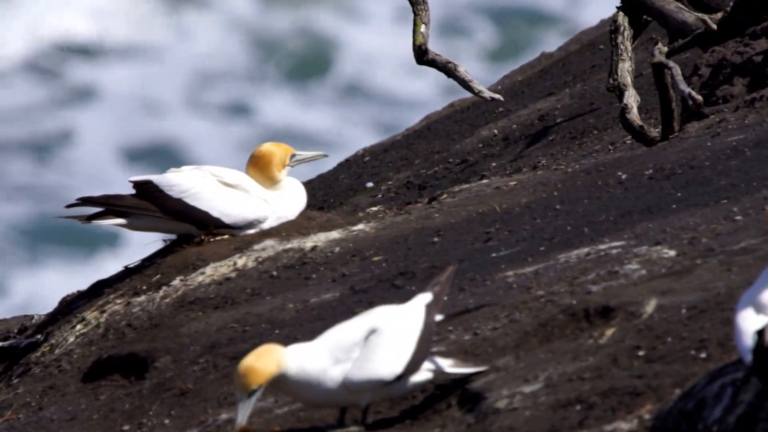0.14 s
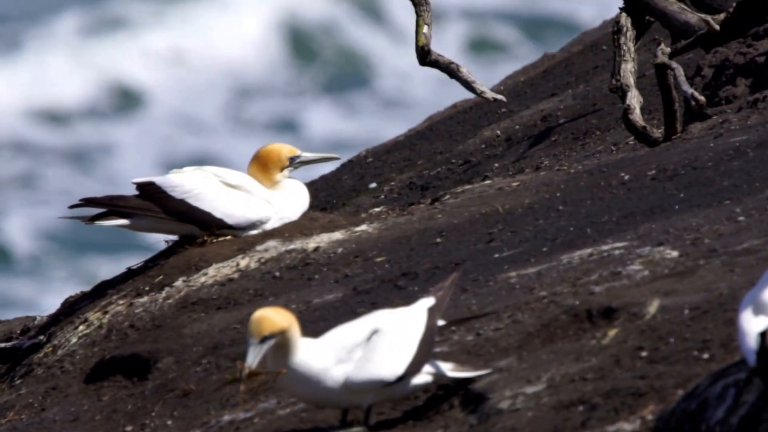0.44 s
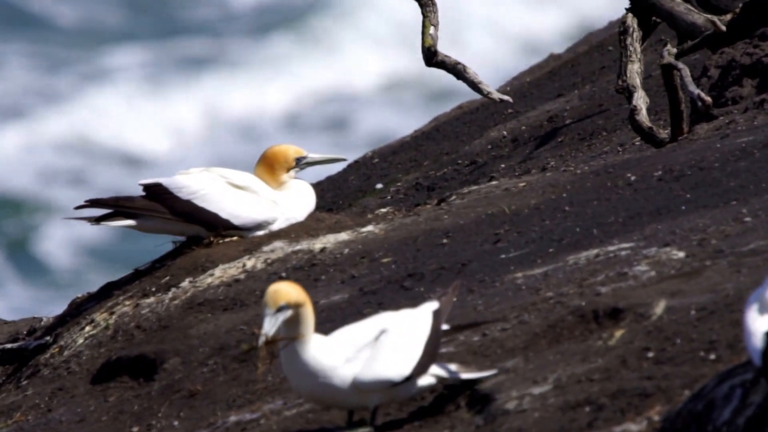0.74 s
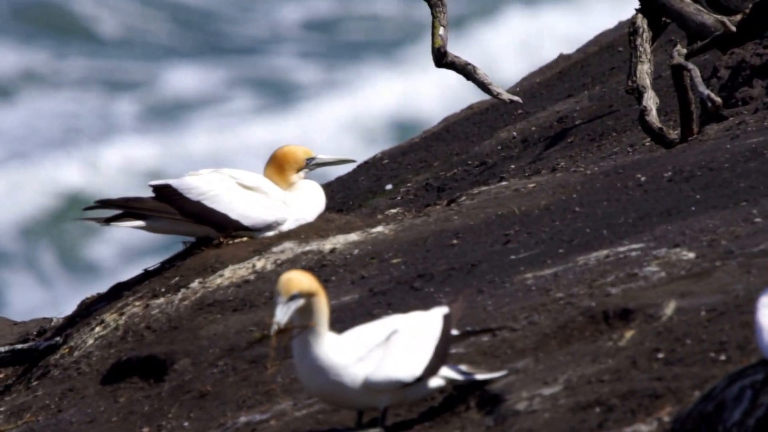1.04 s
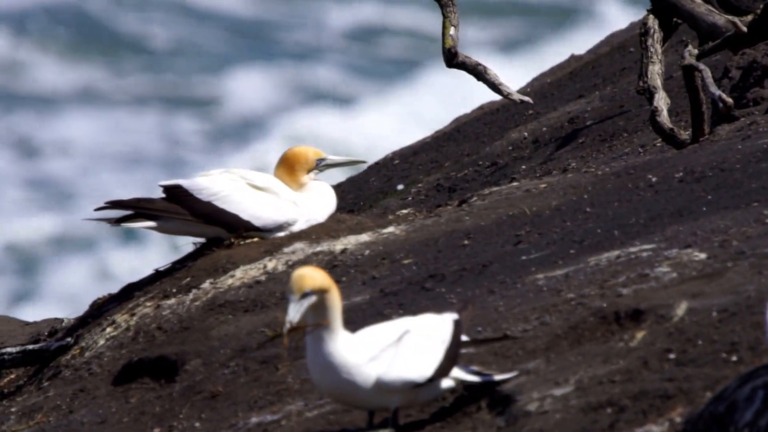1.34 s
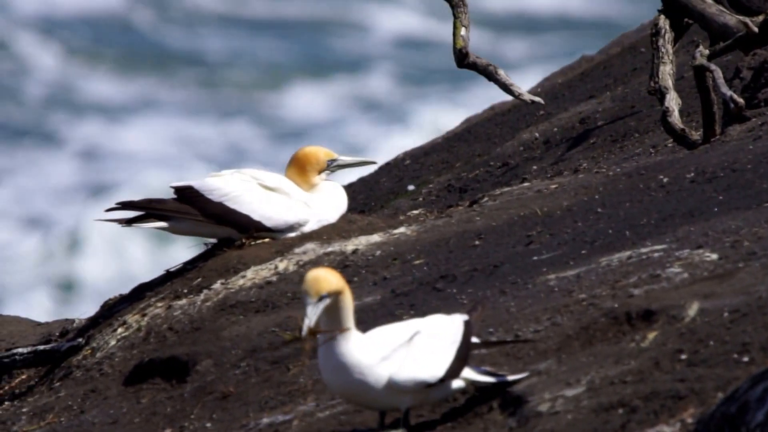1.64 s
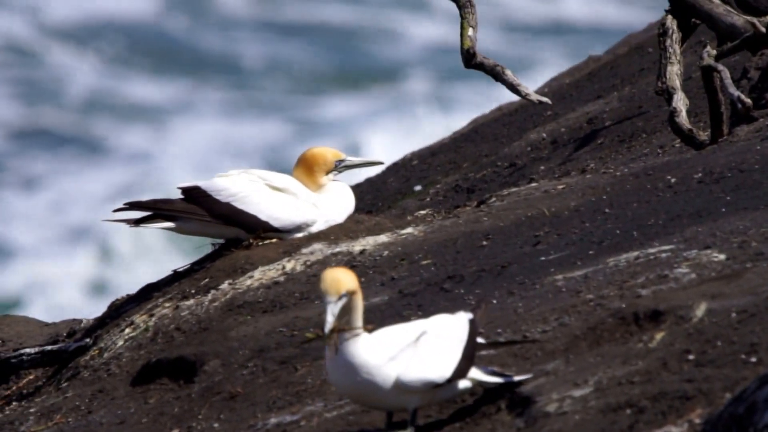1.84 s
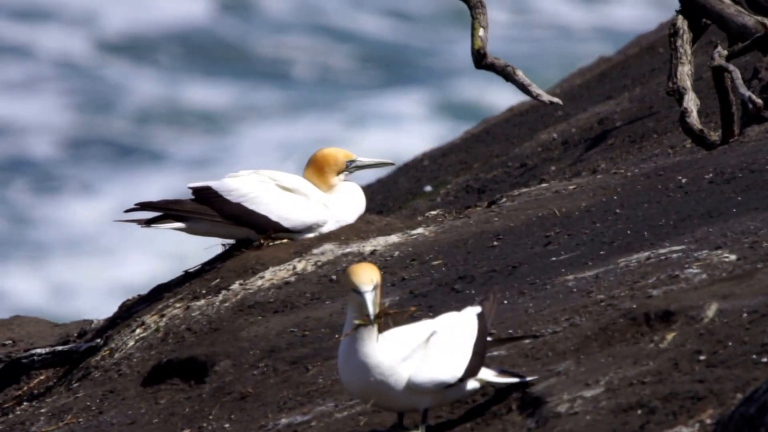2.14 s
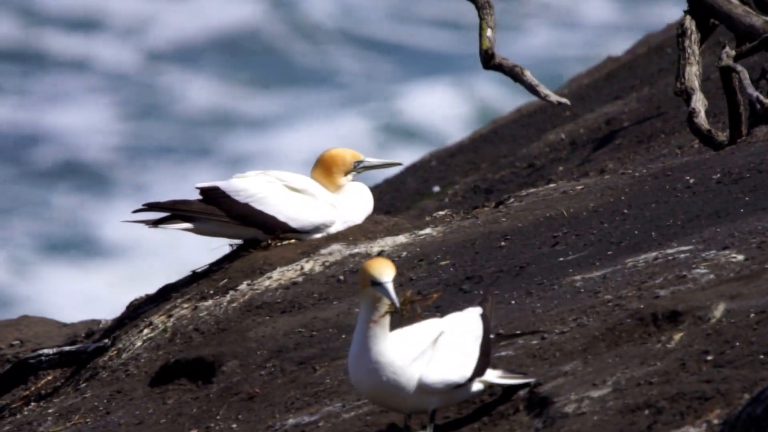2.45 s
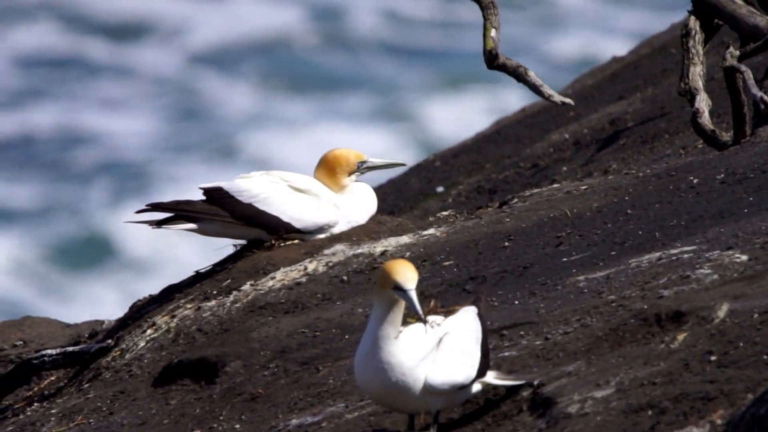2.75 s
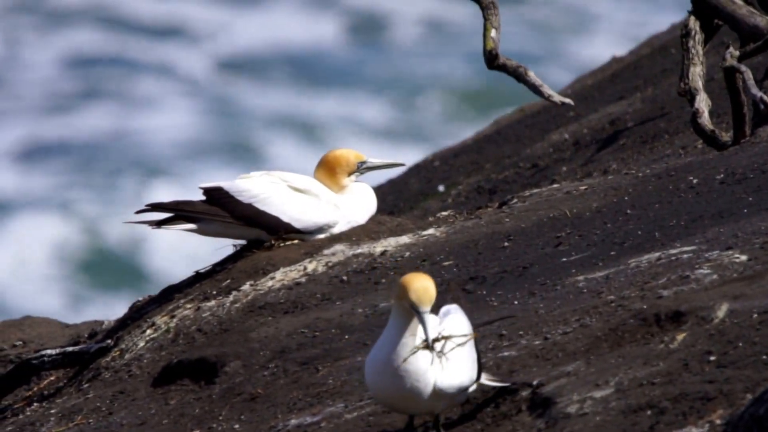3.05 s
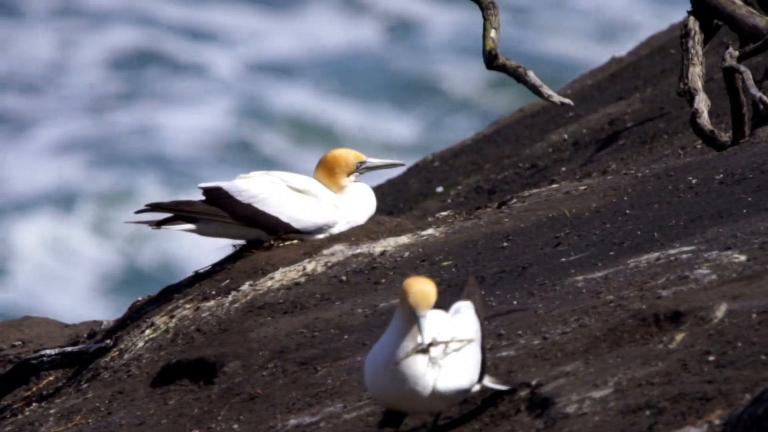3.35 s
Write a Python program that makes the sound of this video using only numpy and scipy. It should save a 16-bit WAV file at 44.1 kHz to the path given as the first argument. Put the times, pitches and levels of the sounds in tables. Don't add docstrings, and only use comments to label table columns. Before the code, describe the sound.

Seabird colony calling continually: short falling squeals, throbbing rasps and brief nasal honks, mostly toward the left. Low wind buffets a small stereo microphone, strongest in the first second, while surf hisses softly behind.

```python
import sys
import numpy as np
from scipy import signal
from scipy.fft import rfft, irfft, next_fast_len
from scipy.io import wavfile
from scipy.ndimage import uniform_filter1d

SR = 44100
rng = np.random.default_rng(int(sys.argv[2]) if len(sys.argv) > 2 else 0)


def inscribe(sig):
    pcm = np.round(np.clip(np.atleast_2d(sig).T, -1, 1) * 32767)
    wavfile.write(sys.argv[1], SR, pcm.astype(np.int16))


def to_linear_factor(level_db):
    exponent = np.asarray(level_db, float) / 20
    return 10 ** exponent


N = 153909
T, M = np.arange(N) / SR, next_fast_len(N)
F = np.fft.rfftfreq(M, 1 / SR)
PORT_SIGN = np.array([[1], [-1]])


def curve(table):
    hz, value = np.transpose(table)
    return np.interp(np.log(F + 1), np.log(hz), value)


def unit(x):
    return x / np.sqrt(np.mean(x ** 2))


def colour(x, gain):
    return irfft(rfft(x, M) * gain, M)[..., :N]


def band(x, hz, width):
    return colour(x, np.exp(-2 * ((F - hz) / width) ** 2))


def walk(rate):
    hold = int(SR / rate)
    steps = np.repeat(rng.standard_normal(N // hold + 1), hold)
    return 1.49 * uniform_filter1d(uniform_filter1d(steps, hold), hold)[:N]


def patchy(table, slow_db, quick_db, rate, lowest, count):
    spectrum = rfft(rng.standard_normal(M)) * to_linear_factor(curve(table))
    swell, octave = walk(3.3), np.log2((F + 1) / lowest)
    out = 0
    for k in range(count):
        bell = np.cos(np.pi / 2 * np.clip(2 * octave - k, -1, 1)) ** 2
        flicker_db = slow_db * swell + quick_db * walk(rate)
        out = out + irfft(spectrum * bell, M)[:N] * to_linear_factor(flicker_db)
    return unit(out)


# freq_hz [Hz], density_db [dB per Hz]
SURF_SPECTRUM = [(180, -38), (300, -7), (484, -4.5), (1050, -4), (3810, -13.5), (4880, -12.5),
                 (8990, -29.5), (10400, -34.5), (15500, -41)]
# freq_hz [Hz], common_share [0 to 1]
SURF_COHERENCE = [(500, 0.8), (1000, 0.88), (4000, 0.29), (8000, 0.68), (13000, 0.28)]


def surf():
    level_db = -42
    left, other = (patchy(SURF_SPECTRUM, .3, 1.2, 12, 200, count=14) for _ in range(2))
    common = np.clip(curve(SURF_COHERENCE), 0, 1)
    right = colour(left, common) + colour(other, np.sqrt(1 - common ** 2))
    return to_linear_factor(level_db) * np.array([left, right])


# time_s [s], level_db [dB]
GUSTS = [(0, -30.5), (.4, -28.5), (.55, -32.5), (.76, -27), (.85, -33), (1.2, -32.5), (1.29, -41.5),
         (1.64, -43.5), (1.699, -26.5), (1.8, -42), (1.92, -35), (2.27, -41), (2.34, -32.5), (2.64, -36),
         (2.74, -39.5), (3.15, -28.5), (3.49, -38)]
# freq_hz [Hz], density_db [dB per Hz]
WIND_IN_STEP = [(20, -5), (108, 0), (172, -1), (295, -7), (585, -21), (1100, -47)]
# freq_hz [Hz], density_db [dB per Hz]
WIND_OPPOSED = [(20, -27), (70, -5.5), (192, -5), (290, -8), (500, -16), (1100, -33)]


def turbulence():
    gust_db, flutter_db, eddy_db, opposed_db = -1, 2.8, 1.5, -0.5
    even_s = .07
    time_s, level_db = np.transpose(GUSTS)
    flow = to_linear_factor(np.interp(T, time_s, level_db) + gust_db + flutter_db * walk(55))
    eddies = [patchy(s, 0, eddy_db, 25.26, 19.9, count=13) for s in (WIND_IN_STEP, WIND_OPPOSED)]
    in_step, opposed = (e / np.sqrt(uniform_filter1d(e ** 2, int(even_s * SR))) for e in eddies)
    return flow * (in_step + to_linear_factor(opposed_db) * opposed * PORT_SIGN)


# [dB, sharp edge re peak]
BUFFETS = [(0.107, -9, 280, -9.5), (0.186, -23, 124, -10), (0.206, -11, 191, -10.5),
           (0.26, -16.5, 230, -11), (0.332, -13.5, 207, -11), (0.37, -15.5, 140, -9.5),
           (0.389, -15.5, 102, -6), (0.418, -12.5, 164, -11), (0.473, -22, 170, -14),
           (0.59, -12, 163, -4.5), (0.644, -18.5, 152, -10), (0.69, -23.5, 111, -10),
           (0.765, -13, 152, -12), (0.916, -23.5, 127, -8.5), (0.972, -17.5, 130, -12.5),
           (1.089, -19, 167, -8), (1.176, -21.5, 118, -8), (1.407, -26.5, 106, -14), (1.534, -31, 180, -11),
           (1.666, -18, 115, -9), (1.708, -22.5, 111, -11), (1.847, -26.5, 113, -13),
           (1.909, -27, 102, -13), (1.977, -24, 200, -12), (2.119, -27.5, 140, -4), (2.327, -20, 146, -6),
           (2.345, -20, 116, -5), (2.398, -21.5, 172, -3), (2.434, -27, 108, -16),
           (2.496, -20.5, 108, -11.5), (2.573, -34, 134, -15), (2.621, -20.5, 108, -10),
           (2.793, -29, 102, -10), (2.866, -22, 178, -11), (2.912, -18.5, 145, -11),
           (2.946, -18.5, 174, -3.5), (3.04, -19, 133, -6.5), (3.069, -15.5, 210, -8.5),
           (3.121, -12.5, 226, -12), (3.143, -14, 118, -1), (3.16, -14, 135, -4), (3.209, -23.5, 101, -10),
           (3.39, -18.5, 155, -8)]


def buffets():
    thump_db, turns = -3, 0.82
    edge_s, edge_hz = .0022, 420
    out = 0
    phases = 2 * np.pi * rng.random((len(BUFFETS), 2))
    for (start, db, hz, edge_db), (p, q) in zip(BUFFETS, phases):
        t = (T - start - .007) * hz
        in_step = np.sin(2 * np.pi * t + p)
        opposed = 0.72 * PORT_SIGN * np.sin(1.6 * 2 * np.pi * t + q)
        out = out + to_linear_factor(db + thump_db) * np.exp(-(t / turns) ** 2) * (in_step + opposed)
        t = T - start - .006
        edge = np.cos(2 * np.pi * edge_hz * t + np.array([[p], [q]]))
        out = out + to_linear_factor(db + edge_db) * np.exp(-(t / edge_s) ** 2) * edge
    return out


def wind():
    return signal.sosfilt(signal.butter(2, 800, fs=SR, output="sos"), turbulence() + buffets())


# start_s [s], level_db [dB], centre_hz [Hz]
BILL_CLICKS = [
    (1.147, -42, 6200),
    (3.453, -56, 12000),
    (3.316, -60, 11500),
    (3.336, -61, 11500),
]


def bill_clicks():
    noise, out = rng.standard_normal(N), 0
    for start, db, hz in BILL_CLICKS:
        burst = noise * np.exp(-((T - start) / 0.0045) ** 2)
        out = out + to_linear_factor(db) * band(burst, hz, hz / 2)
    return out


def calls(rows, partials_db, trill, bend, waver=.01):
    trill_hz, trill_drop, hoarse_db = 74, .05, 2
    attack_s, release_s = 0.0048, 0.0088
    out, wander, rough = np.zeros(N), walk(150), walk(120)
    for (start, length, db, hz0, hz1), (beat, tempo) in zip(rows, rng.random((len(rows), 2))):
        on = (T >= start) & (T < start + length)
        t = T[on] - start
        cycle = (t * trill_hz * (0.838 + 0.19 * tempo) + beat) % 1
        glide = hz1 + (hz0 - hz1) * (1 - t / length) ** bend
        hz = glide * (1 + waver * wander[on] - trill * trill_drop * (cycle - .5))
        phase = 2 * np.pi * np.cumsum(hz) / SR
        tone = sum(to_linear_factor(p) * np.sin((k + 1) * phase) for k, p in enumerate(partials_db))
        level = to_linear_factor(db + 6.5 + hoarse_db * np.sqrt(trill) * rough[on])
        shape = np.clip(t / attack_s, 0, 1) * np.clip((length - t) / release_s, 0, 1)
        chop = (1 - trill * np.cos(np.pi * cycle) ** 2) ** 2
        out[on] += level * shape * chop * tone
    return out


def far_calls():
    count, lowest_hz, change, level_db = 60, 739.3, 1.03, -61
    r = rng.random((count, 4))
    hz = lowest_hz * (1 + r[:, 3])
    rows = np.c_[r[:, 0] * N / SR, .03 + .06 * r[:, 1], level_db + 6 * r[:, 2], hz, hz * change]
    return calls(rows, [-11, 0, -10], trill=1.0, bend=0.91)


# start_s [s], length_s [s], level_db [dB], start_hz [Hz], end_hz [Hz]
HONKS = [(0, .11, -51, 1040, 980), (.375, .058, -45, 1005, 1065), (.71, .075, -52, 1000, 1030),
         (1.04, .075, -47, 995, 1060), (1.37, .09, -54, 1130, 1000), (3.32, .045, -48, 925, 960),
         (.48, .033, -48, 1524, 1540), (.56, .033, -48.5, 1515, 1550), (.69, .031, -48, 1520, 1550),
         (1.315, .035, -49.5, 1520, 1600), (1.715, .06, -49, 1095, 1170)]


def honks():
    return calls(HONKS, [0, -11, -22], trill=0.35, bend=0.87, waver=.005)


# start_s [s], length_s [s], level_db [dB], start_hz [Hz], end_hz [Hz]
YELPS = [(1.71, 0.071, -54, 1119, 1183), (1.825, 0.023, -49, 1168, 1200), (1.885, 0.022, -51, 1123, 1100),
         (1.97, 0.038, -45.5, 1164, 1206), (2.03, 0.062, -53.5, 1240, 1128), (2.085, 0.07, -50, 1155, 1186),
         (1.24, 0.028, -52, 1045, 1030), (2.612, 0.069, -54.5, 964, 928), (3.07, 0.025, -51, 1030, 1120),
         (2.83, 0.049, -51.5, 913, 978), (2.92, 0.033, -54, 955, 937), (2.99, 0.056, -54.5, 937, 860),
         (3.105, 0.021, -45, 1043, 1090), (3.355, 0.045, -51, 1010, 1010), (3.43, 0.024, -48, 1037, 976)]


def yelps():
    return calls(YELPS, [-11, 0, -10], trill=0.11, bend=0.85, waver=.005)


# start_s [s], length_s [s], level_db [dB]
RASPS = [(0, 0.064, -49.5), (0.522, 0.16, -47), (0.638, 0.16, -50.5), (1.305, 0.17, -49),
         (1.562, .13, -52.5), (1.858, 0.13, -54), (2.061, 0.4, -54.5), (2.342, 0.35, -48.5),
         (2.684, 0.085, -50), (2.851, 0.4, -51.5), (3.217, 0.071, -50), (3.281, 0.15, -41.5),
         (3.451, 0.09, -47)]
# centre_hz [Hz], width_hz [Hz], level_db [dB]
RASP_THROAT = [(2500, 1420, -1), (5520, 1480, 0.5), (7630, 1900, -8), (10400, 4500, -24)]


def rasps():
    throb_hz, throb_floor = 58, .3
    noise = rng.standard_normal(N)
    throat = [to_linear_factor(db + 2 * walk(30.1)) * unit(band(noise, hz, w)) for hz, w, db in RASP_THROAT]
    hoarse = unit(sum(throat))
    gate, drift = 0, 0.31 * walk(24.88)
    for start, length, db in RASPS:
        cycle = ((T - start) * throb_hz + drift) % 1
        arch = np.sin(np.pi * np.clip((T - start) / length, 0, 1) ** 0.8) ** 1.3
        throb = np.clip(np.minimum(cycle / 0.064, (.8 - cycle) / 0.12), 0, 1)
        gate = gate + to_linear_factor(db) * arch * (throb_floor + throb)
    return hoarse * gate


# start_s [s], length_s [s], level_db [dB], start_hz [Hz], end_hz [Hz]
SLIDES = [(.165, .125, -55, 5300, 4620), (.16, .045, -56, 4900, 4450), (.375, .06, -53, 4950, 4200),
          (1.455, .08, -56, 4700, 3980), (1.87, .057, -55, 4650, 4150), (2.1, .065, -56, 4750, 4080),
          (2.11, .06, -59, 5400, 4800), (2.7, .09, -57, 4950, 4100), (3.365, .09, -51, 5450, 4350),
          (.81, .045, -55, 2550, 2700), (.925, .014, -55, 6050, 6000), (.95, .025, -56, 5850, 5800)]
SLIDE_PARTIALS = [-1.5, -15]


def slides():
    return calls(SLIDES, SLIDE_PARTIALS, trill=0.31, bend=1.2, waver=.005)


# start_s [s], length_s [s], level_db [dB], start_hz [Hz], end_hz [Hz]
THIN_SQUEALS = [(1.065, .14, -63, 5230, 4330), (.06, .05, -62, 4900, 4370), (.15, .06, -66, 4300, 3850),
                (.91, .08, -67, 4900, 4500), (.8, .05, -65, 4500, 4150), (.62, .065, -61, 4900, 4400),
                (1.97, .05, -64, 4500, 4200), (2.1, .1, -65, 5200, 4650), (.5, .065, -64, 4800, 4150),
                (2.375, .06, -64, 5000, 4600), (2.82, .08, -63, 4850, 4350), (2.925, .1, -63, 5250, 4550),
                (3.02, .07, -60, 4850, 4350), (3.24, .03, -63, 4950, 4800), (3.455, .035, -59, 4650, 4400),
                (.15, .045, -66, 4950, 4550)]


def thin_squeals():
    return calls(THIN_SQUEALS, [1, 0], trill=.75, bend=1.4)


# start_s [s], length_s [s], level_db [dB], start_hz [Hz], end_hz [Hz]
SQUEALS = [(0, .045, -53, 5200, 4800), (.315, .06, -53, 4500, 4100), (1.06, .07, -54, 5300, 4800),
           (.485, .085, -52, 4800, 4200), (.62, .125, -49.5, 4810, 4300), (1.13, .068, -54, 5250, 4500),
           (1.29, .15, -49.5, 4750, 4220), (1.87, .095, -49.5, 5350, 4500), (1.785, .04, -57, 5100, 4600),
           (2.1, .145, -50, 4800, 4340), (2.59, .11, -49, 5300, 4200), (2.83, .04, -53, 4770, 4400),
           (2.95, .09, -54, 4900, 4400), (3.31, .06, -52, 4900, 4400)]


def squeals():
    return calls(SQUEALS, [-2, -19], trill=.75, bend=1.6)


def colony():
    decay_s, scatter_db = .22, -7
    terns = squeals() + thin_squeals() + slides() + rasps()
    birds = terns + honks() + yelps() + far_calls() + bill_clicks()
    t = np.arange(12000) / SR
    tail = rng.standard_normal((2, len(t))) * to_linear_factor(-60 * t / decay_s) * (t > .004)
    tail = tail / np.sqrt(np.sum(tail ** 2, axis=1, keepdims=True))
    return birds + to_linear_factor(scatter_db) * signal.fftconvolve(birds[None], tail, axes=1)[:, :N]


# freq_hz [Hz], gain_db [dB]
RIGHT_PORT = [(500, -1.5), (1000, -2.5), (2400, -7.5), (4400, -5), (8000, -5.5), (13000, 1.5)]


def scene():
    lag_s = 4.5e-5
    air = colony() * to_linear_factor(np.array([[4], [1.5]])) + surf()
    right = colour(air[1], to_linear_factor(curve(RIGHT_PORT)) * np.exp(-2j * np.pi * F * lag_s))
    return np.array([air[0], right]) + wind()


def top_cut(x):
    return signal.sosfilt(signal.butter(12, 16080, fs=SR, output="sos"), x)


def record(dry):
    top_hz = 15760
    rounded = np.tanh(dry / 0.51) * 0.6
    mix = colour(rounded, F < top_hz)
    return top_cut(mix)


dry = scene()
out = record(dry)
inscribe(out)
```